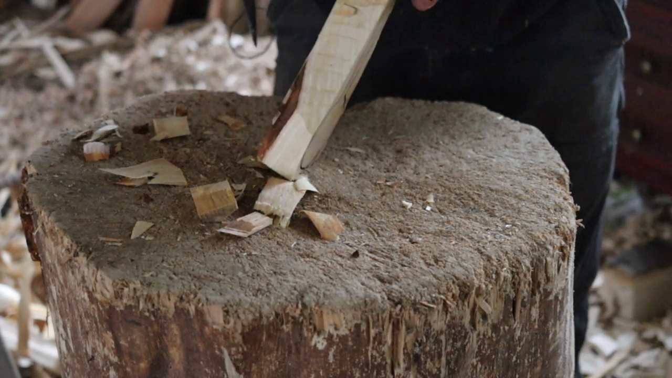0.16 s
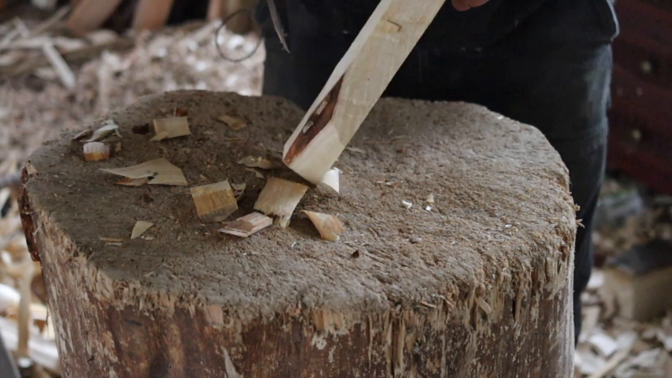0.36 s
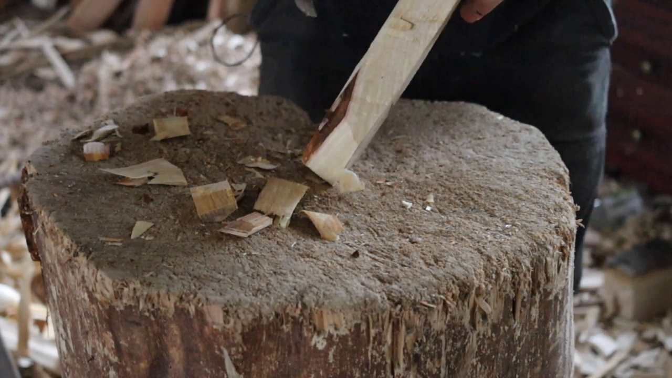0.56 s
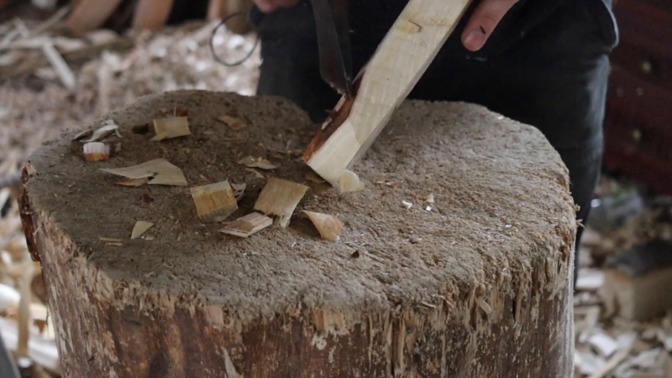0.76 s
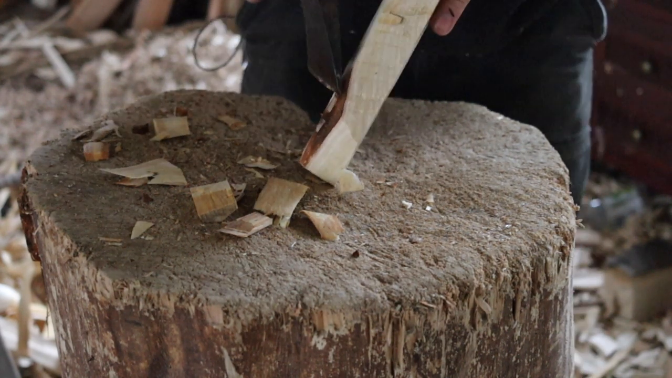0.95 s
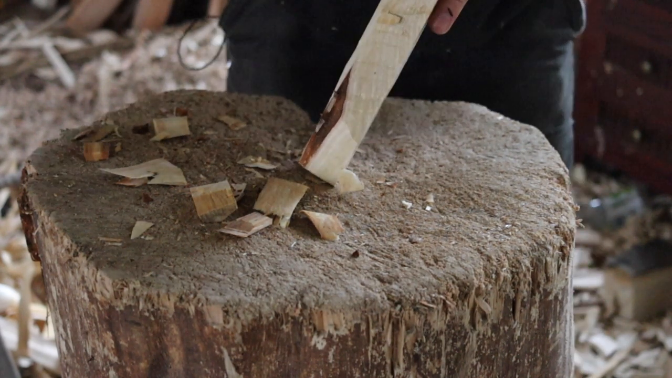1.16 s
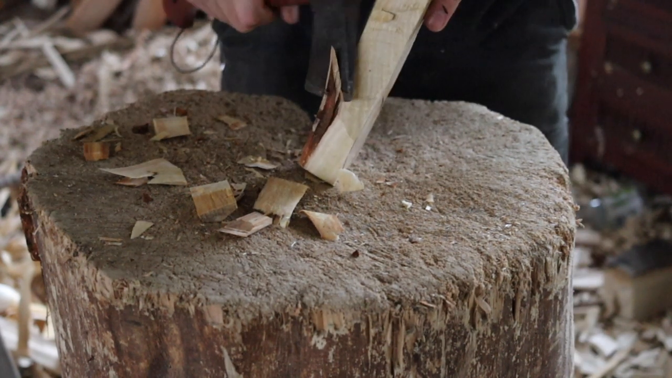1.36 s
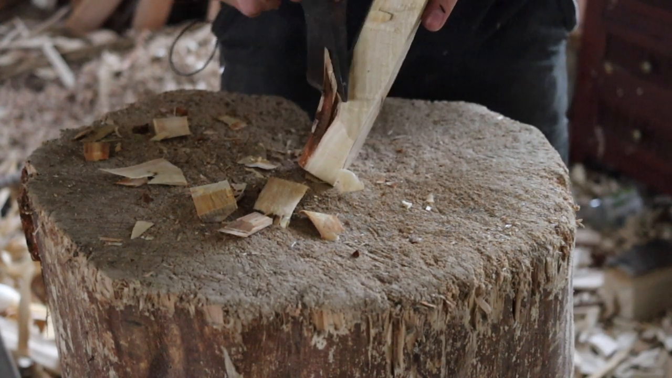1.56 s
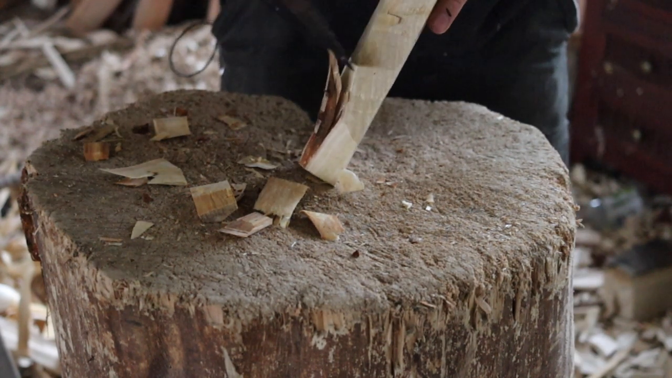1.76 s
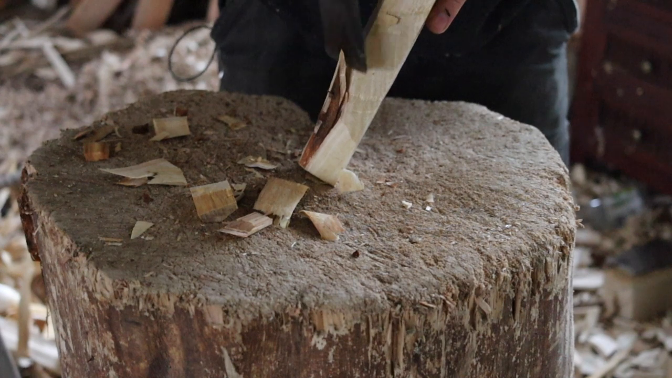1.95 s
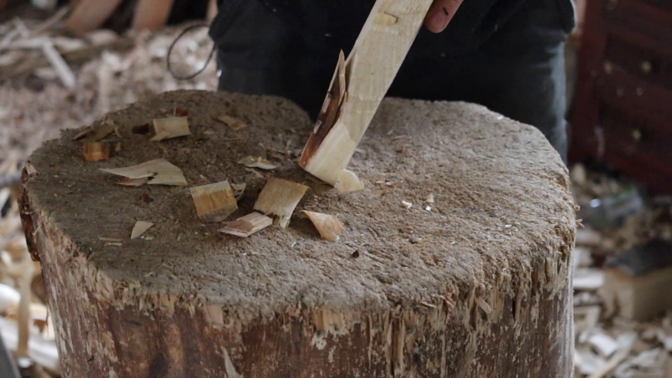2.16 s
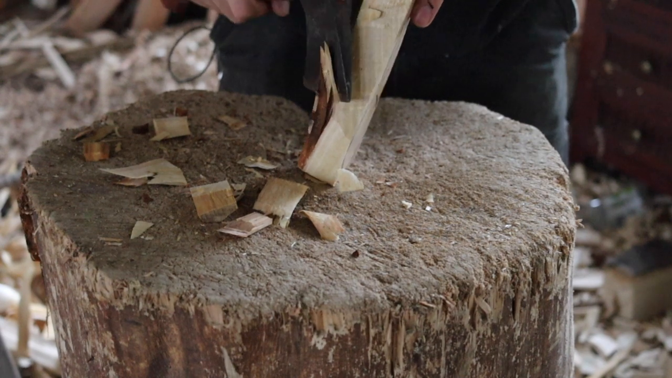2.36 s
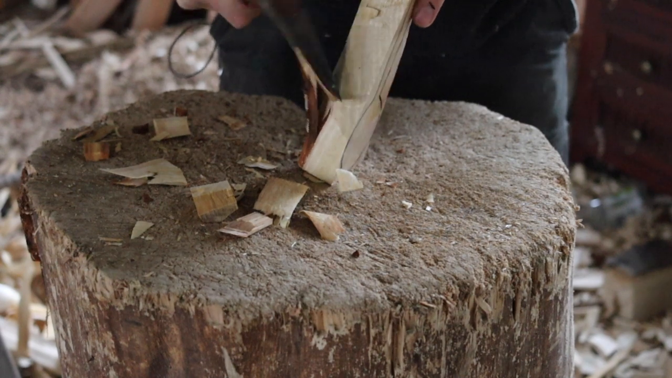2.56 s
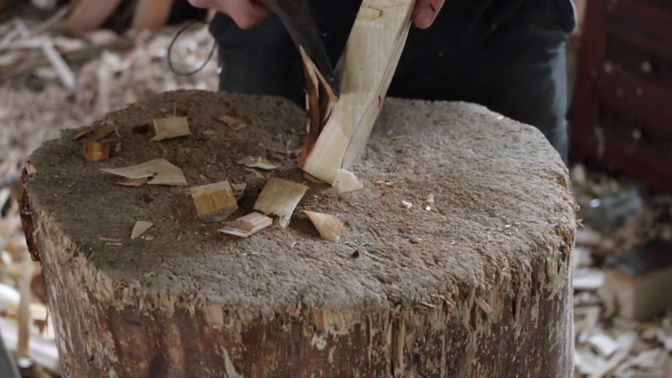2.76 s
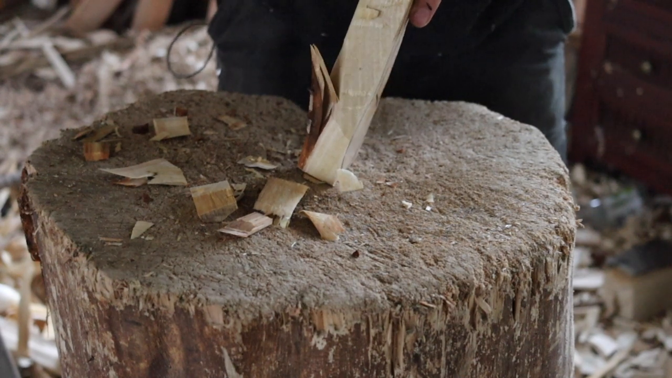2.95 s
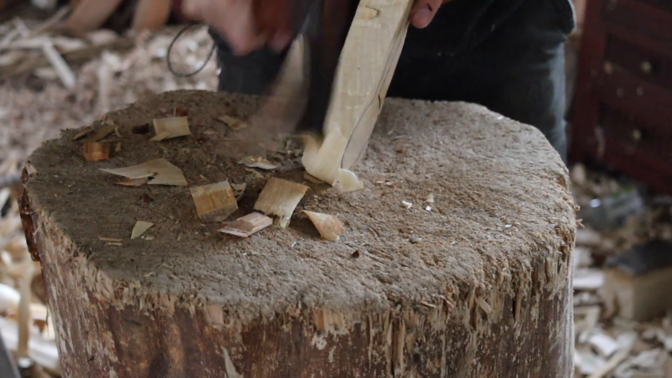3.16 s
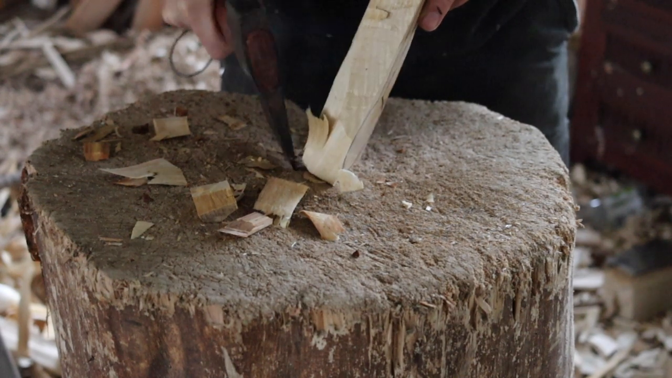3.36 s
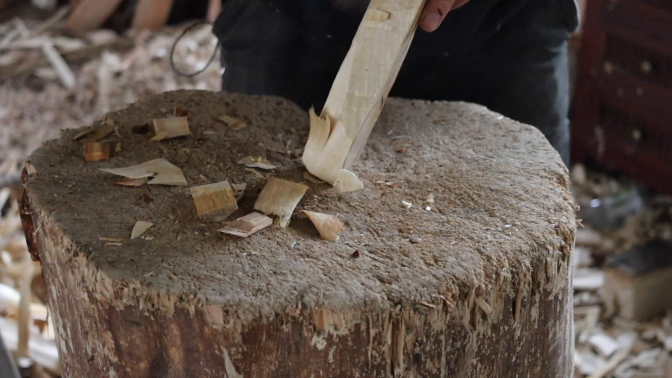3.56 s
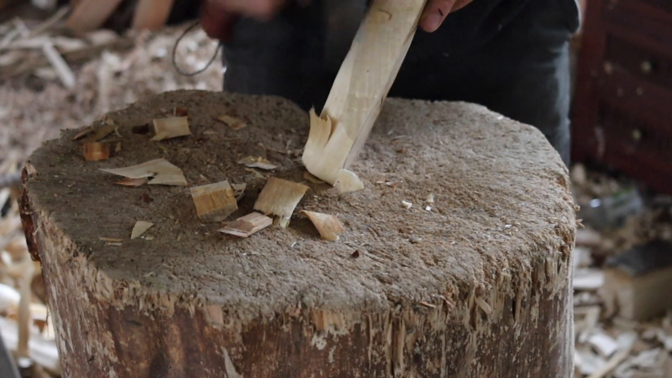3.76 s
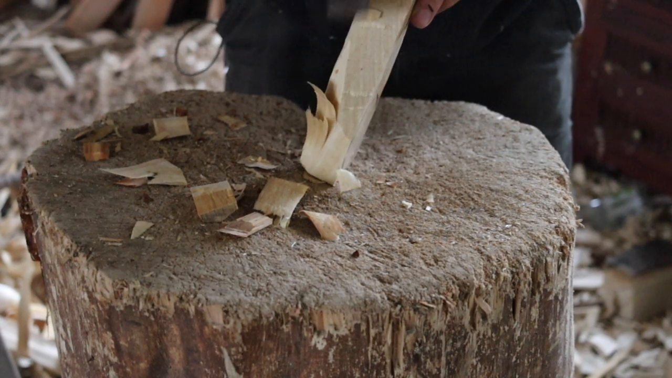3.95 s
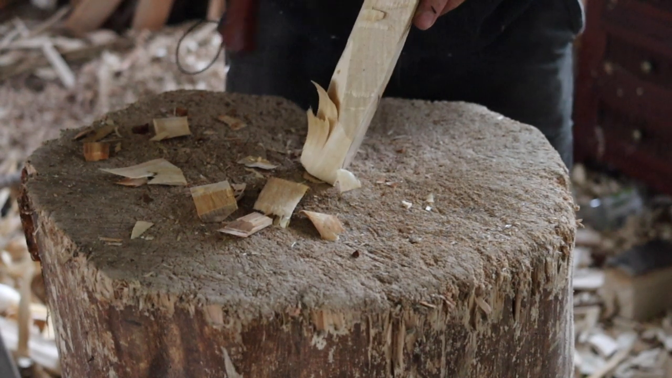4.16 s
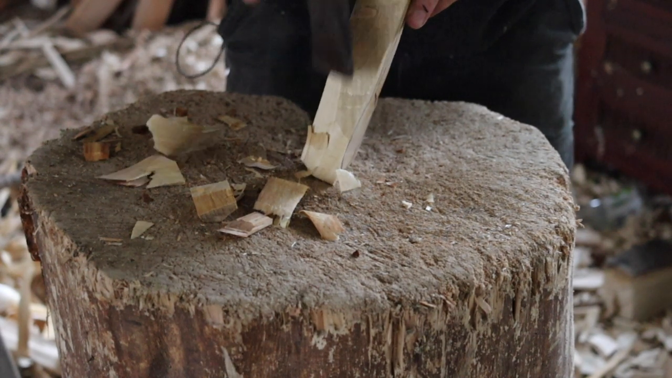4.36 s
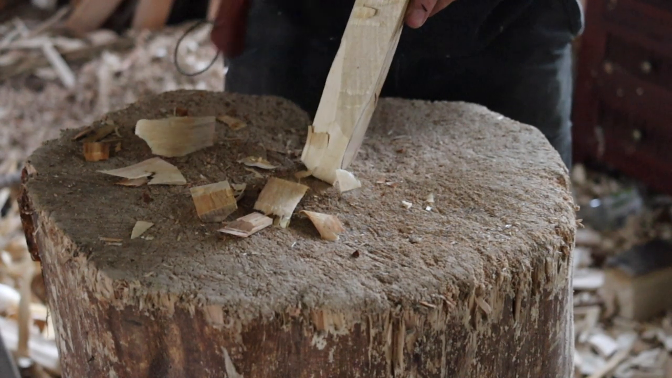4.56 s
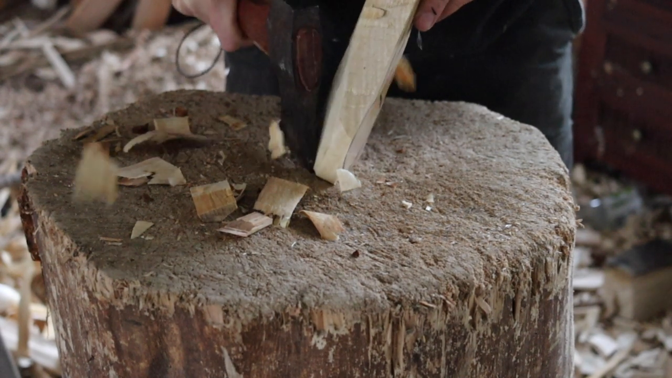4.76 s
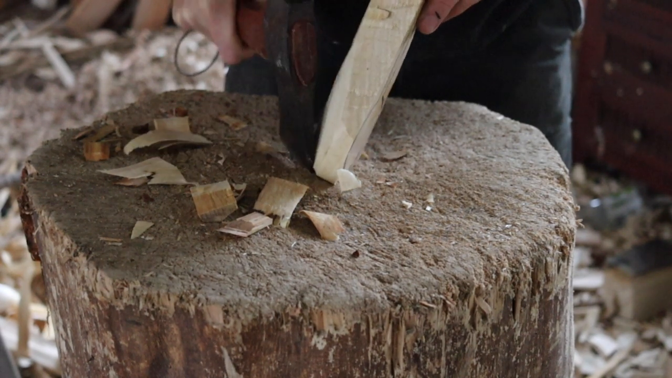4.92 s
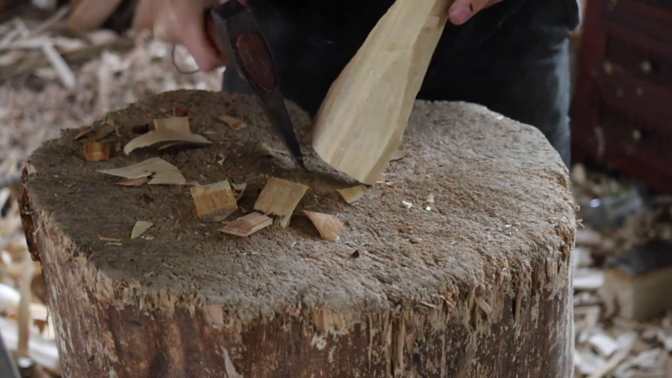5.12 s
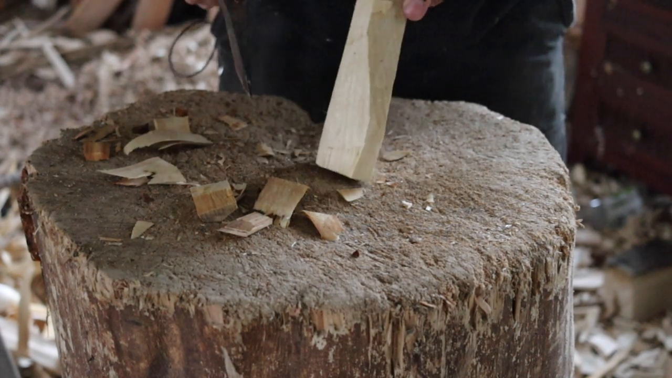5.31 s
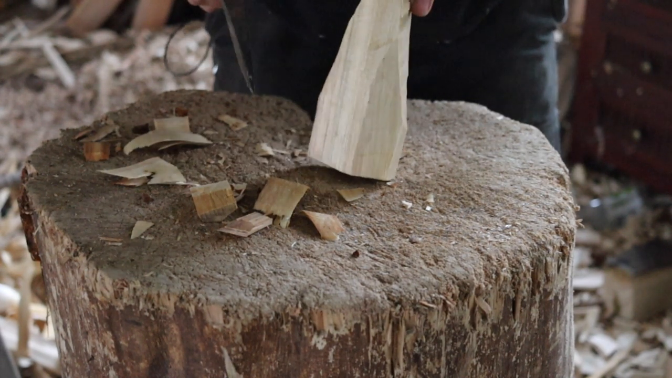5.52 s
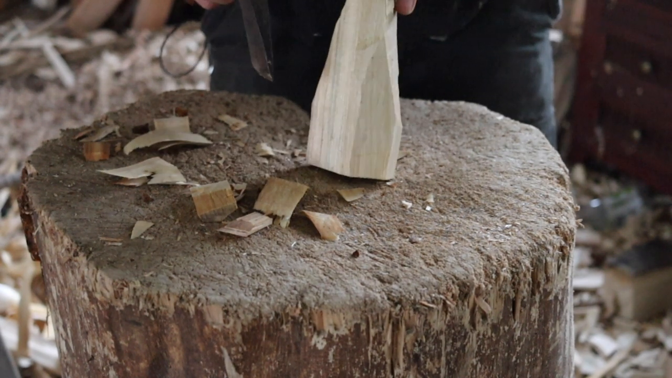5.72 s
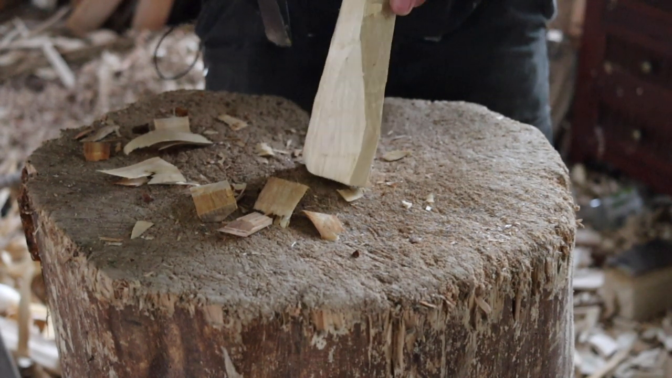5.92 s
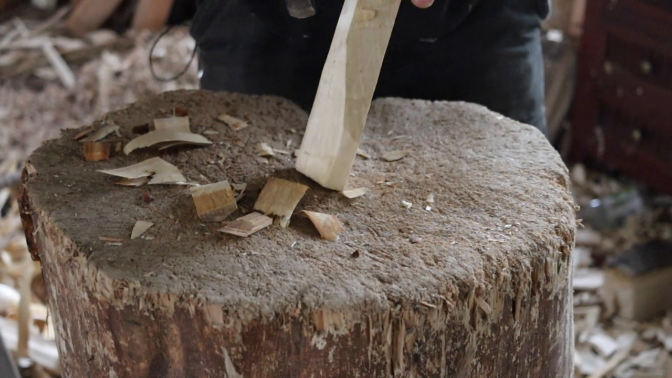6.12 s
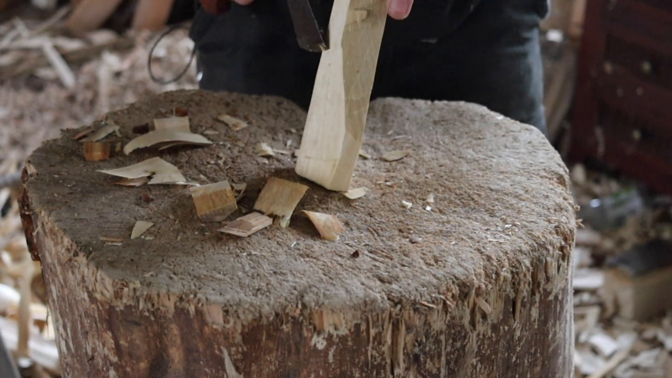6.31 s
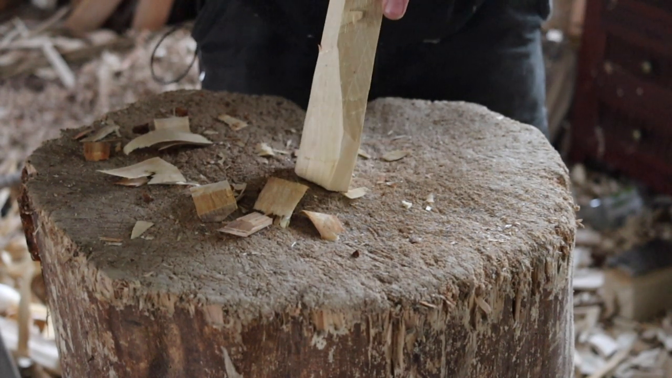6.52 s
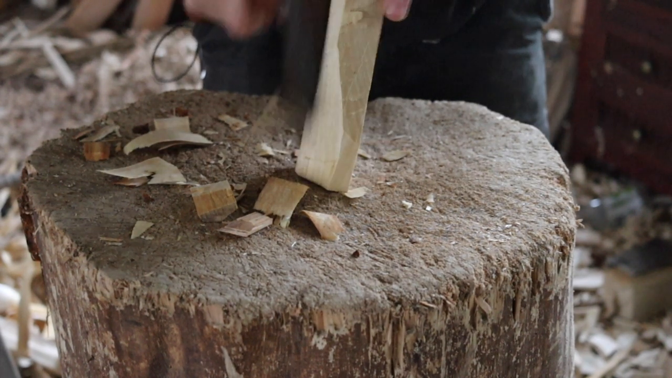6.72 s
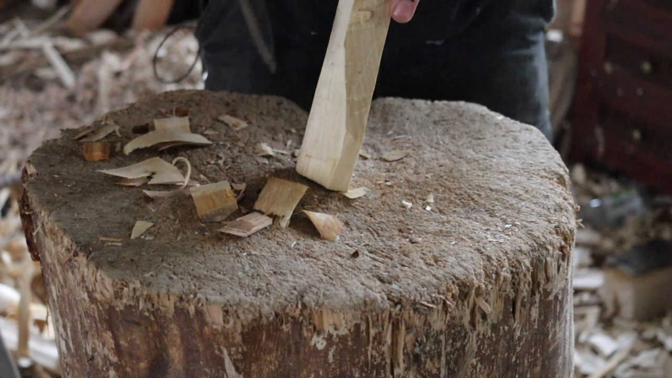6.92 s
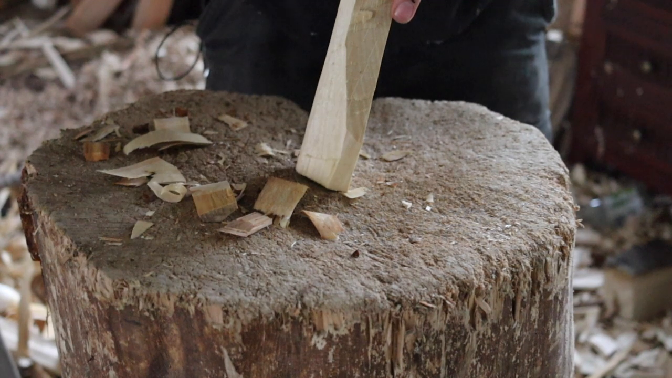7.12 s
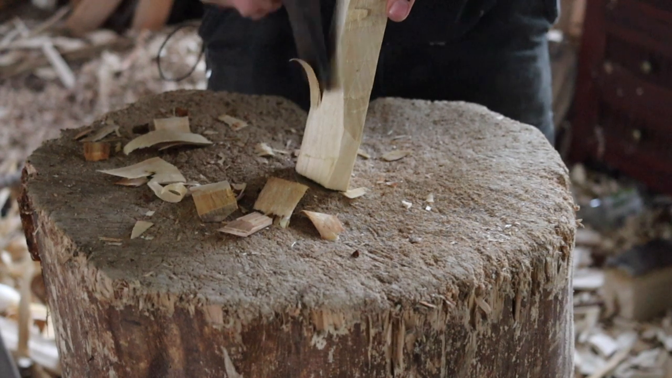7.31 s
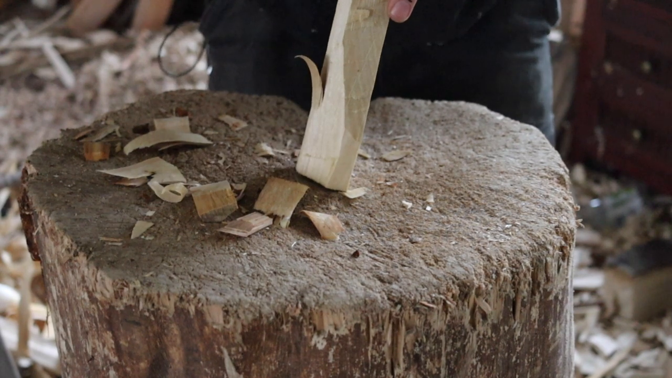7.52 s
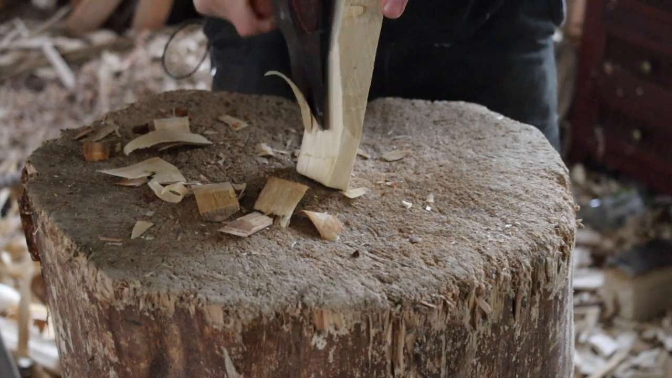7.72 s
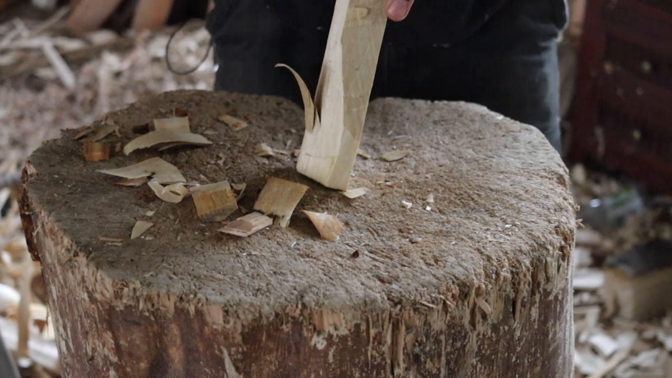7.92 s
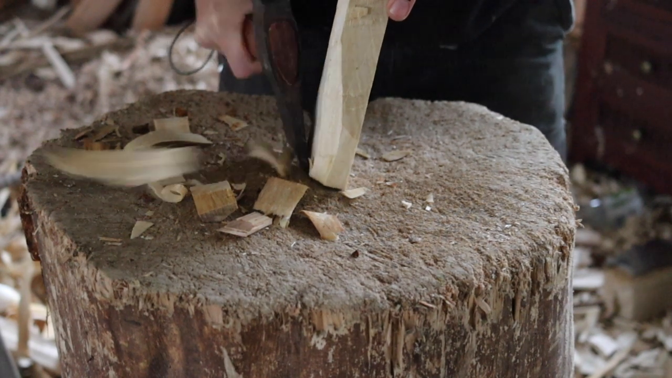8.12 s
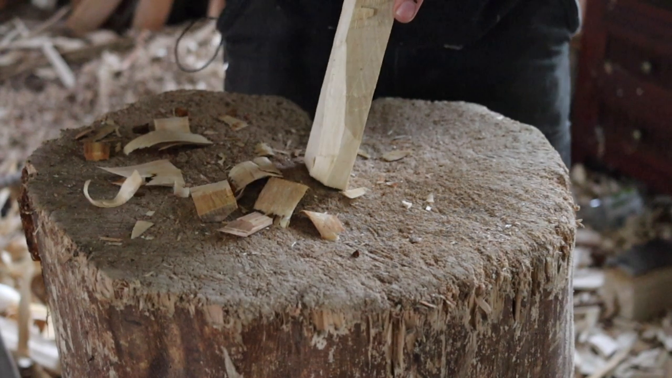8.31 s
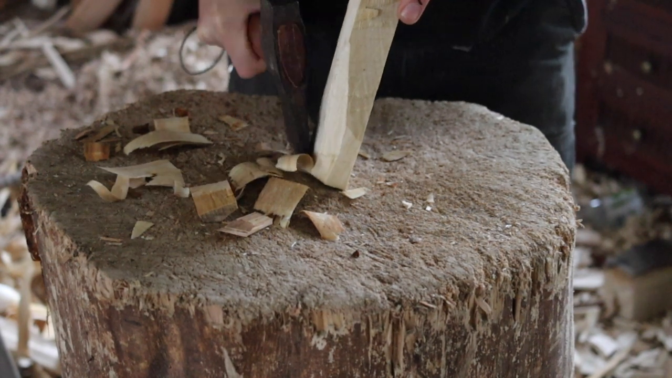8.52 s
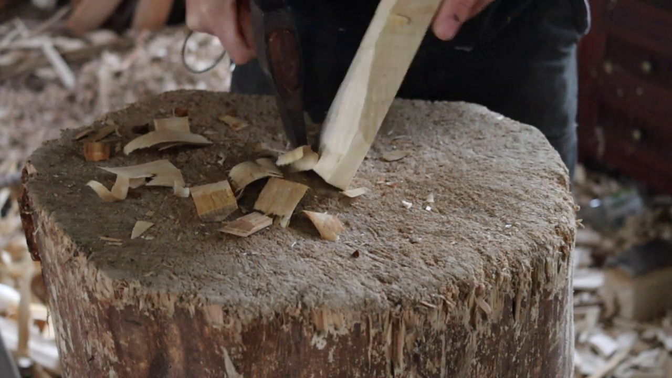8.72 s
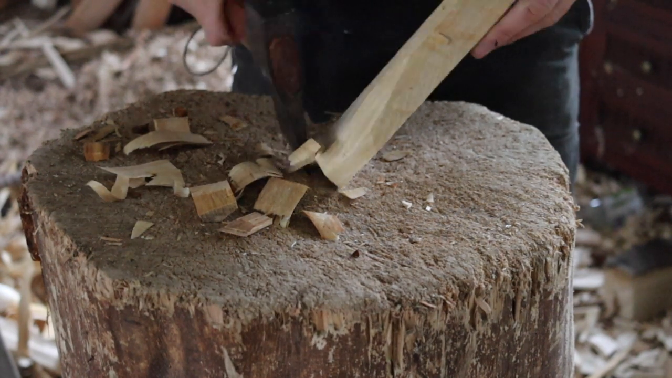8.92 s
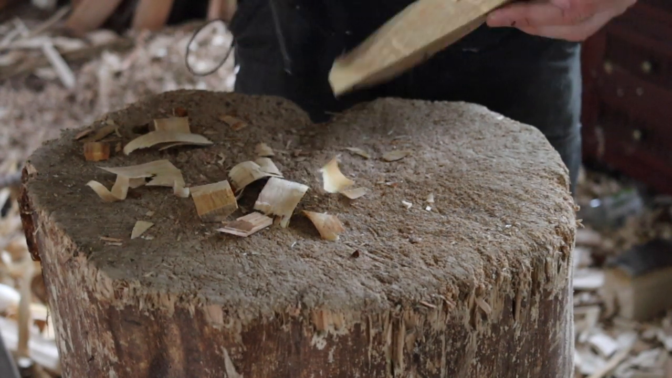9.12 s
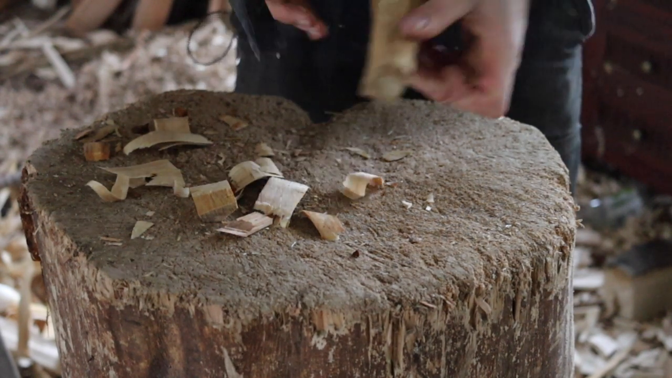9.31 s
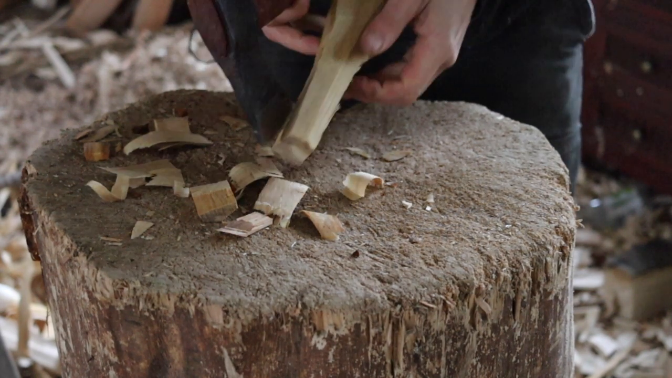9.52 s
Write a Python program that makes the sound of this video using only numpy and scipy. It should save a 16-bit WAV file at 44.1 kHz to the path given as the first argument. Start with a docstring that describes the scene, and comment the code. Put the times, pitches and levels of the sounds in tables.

```python
"""Over faint still air, wood scrapes and taps on a chopping stump; then a small axe hews a wooden spoon blank.
Each chop is an impact and a run of fibre fractures, both exciting damped modes of the wood; what is left
of the swing sounds the stump and shakes the microphone's support. Rubbing, bouncing taps, a glancing blow,
crumbs and snapping splinters are noise and pulses through resonances. Decaying noise forms the workshop's
echo; the close microphone overloads on the blows."""
import sys
import numpy as np
from scipy import signal
from scipy.fft import rfft, irfft
from scipy.io import wavfile
from scipy.ndimage import map_coordinates

SR = 44100
rng = np.random.default_rng(int(sys.argv[2]) if len(sys.argv) > 2 else 0)


def dump(signal):
    """Clip the signal to [-1, 1] and save it as 16-bit WAV at the path in sys.argv[1]."""
    limited = np.clip(np.atleast_2d(signal).T, -1, 1)
    pcm = np.round(limited * 32767).astype(np.int16)
    wavfile.write(sys.argv[1], SR, pcm)


N = 426447

# axe blows: (time [s], knock level [dB], length of the cut [s], share of the cut at which the chip gives way [1],
# tearing level [dB], tearing tilt [dB/octave], blank's ring [Hz], ring level [dB],
# stump's deep thud level [dB], stump's hollow knock level [dB])
CHOPS = [(1.4461, -20, 0.011, 0.79, -18, 9, 2340, -25, -26, -32.5),
         (2.383, -25, .017, 0.41, -28, 0, 2290, -27.5, -29.5, -42),
         (3.2538, -16.5, .013, 1, -9, 2, 2340, -14, -19, -17),
         (3.879, -15.5, .013, .35, -25.5, 3, 2280, -29.5, -26, -21.5),
         (4.3104, -17, 0.008, 0.87, -11.5, .5, 2360, -23.5, -25, -23),
         (4.7016, -19, .015, 0.9, -7.5, -2.5, 2556, -21, -8.5, -12),
         (6.8106, -24.5, 0.019, 0.41, -26, -1.5, 2385, -21.5, -40, -27),
         (6.848, -19.5, 0.0027, 0.59, -35.5, -1, 2390, -41, -13, -21),
         (7.3202, -15.5, .009, 0.58, -21, 4, 2470, -18, -28, -23),
         (7.7525, -13, 0.0097, 0.46, -11, -2, 2130, -28, -20, -20),
         (8.189, -16, 0.0077, 0.2, -3, 0.5, 2345, -18.5, -17, -16),
         (8.586, -8.5, 0.012, 0.29, -6, -4.5, 2290, -12, -7.5, -8)]
# modes of the blank knocked on the stump: (frequency [Hz], width [Hz], level [dB])
KNOCK_MODES = [(179, 430, -13.5), (544, 180, -5.5), (706, 160, 0), (927, 150, 1), (1090, 180, -2.5),
               (1300, 380, -8.5), (1700, 450, -14.5)]
# spectrum of tearing fibres: (frequency [Hz], level [dB])
FIBRE_SPECTRUM = [(100, -13), (500, -1.5), (1200, 5), (3000, 0), (5000, -0.5), (7000, -14.5),
                  (11000, -15.5), (16000, -15.5)]
# overtones of the blank's bending: (frequency [Hz], width [Hz], level before OVERTONE_DB and tilt [dB])
BENDING_OVERTONES = [(4220, 200, -1), (4400, 190, -2), (4980, 200, -9)]
OVERTONE_DB = -8  # shift of all overtones against the main ring
OVERTONE_DB_PER_TILT = 1.1  # a brighter tear lifts them: dB per dB/octave

# the blank is stood on the stump: (time [s], deep thud level [dB])
SET_DOWNS = [(0.873, -35.5), (6.313, -43.5)]
SET_HOLLOW_DB = -6.5  # hollow knock of a set-down, relative to its thud
# deep modes of the stump: (frequency [Hz], width [Hz], level [dB])
THUD_MODES = [(126.5, 31, 2.5), (189.3, 22, 4), (208.3, 18, -1.5), (266, 26, -2.5), (313.6, 18, -2),
              (341, 4.2, -3), (380.6, 14, -2.5)]
# hollow modes of the stump's top: (frequency [Hz], width [Hz], level [dB])
HOLLOW_MODES = [(656, 110, 0), (679.6, 83, -1), (787, 52, 0), (888, 120, -0.5), (1010, 50, 5.5),
                (1140, 280, 1.5), (1291, 250, 0.5), (1385, 180, -2)]
# slow, deep modes of the microphone's support: (frequency [Hz], level [dB], 60 dB decay time [s], delay [s])
SUPPORT_MODES = [(25.05, 3, 1.4, 0.0099), (31, -3, .45, .004), (47.3, 8, 0.45, 0.042), (62, 0.5, .3, 0.011)]
SHAKE_MAX_DB, SHAKE_UNDER_THUD_DB = -33, -6  # limit of the shudder; its level under a gentle thud

# taps of blank, chips and stump, and a glancing blow of the axe:
# (time [s], peak level [dB], tilt [dB/octave])
TAPS = [(.494, -24.5, -7), (.549, -20.5, 20), (.585, -20, 8), (0.5943, -11.5, -0.5), (0.698, -27.5, 10),
        (.72, -21.5, -8.5), (.859, -21, -2), (.95, -25, -1.5), (1.161, -35.5, 4), (1.821, -35, 10.5),
        (1.931, -45, -9.5), (3.7744, -8.5, 0.5), (3.791, -14, 0.5), (3.807, -29, 1), (5.055, -32.5, -7.5),
        (5.2977, -16.5, 2), (5.304, -19.5, 2), (5.4615, -33, -4), (5.57, -26, -0.5), (6.1329, -36.5, -0.5),
        (6.244, -36.5, -8.5), (6.344, -31, 8), (6.446, -40.5, 6), (8.7085, -17, 0), (8.9068, -25.5, -1.5),
        (9.5126, -23, -3.5)]
# spectrum of a tap: (frequency [Hz], level [dB])
TAP_SPECTRUM = [(60, -30), (300, 1.5), (900, 5), (2000, 6.5), (3800, 1.5), (6000, -12.5), (10000, -29.5),
                (16000, -20)]
REBOUND_S, REBOUND_DB = .0095, -10.5  # every tap bounces once
# splinters snap as a chip is levered away: (time [s], peak level of the first snap [dB])
SPLINTERS = [(0.87, -16.5), (1.686, -12), (1.712, -19.5), (1.733, -22.5), (2.684, -18.5), (3.61, -31.5),
             (5.093, -40.5), (5.15, -37), (9.0735, -41)]
# spectrum of a snap: (frequency [Hz], level [dB])
SNAP_SPECTRUM = [(100, -19.5), (600, 2), (1500, -11.5), (2400, -4), (5000, 1.5), (8000, -7), (12000, -2.5),
                 (16000, -13.5)]
RUN_ON_S, RUN_ON_DB = 0.0055, -10.5  # the split runs on: mean gap between snaps, step in level
# modes ringing when the blank meets the axe head: (frequency [Hz], level [dB], 60 dB decay time [s])
CLINK_MODES = [(950, -19, .02), (2140, -16, .08), (2345, -21, .06), (3030, -32, .025), (4280, -38, .04),
               (4500, -39, .04)]
CLINK_S = 9.5135

# the blank is dragged or turned on the stump, or the blade skids off it:
# (start [s], length [s], pressure level [dB], grit level relative to the pressure [dB])
STROKES = [(0.407, 0.11, -46.5, -8), (0.519, 0.1, -42.5, 1), (0.689, 0.081, -47, -7),
           (0.897, 0.062, -40, -3.5), (3.769, 0.024, -40.5, -1.5), (5.291, 0.021, -51.5, -4),
           (5.546, 0.043, -53.5, 2), (6.215, 0.031, -56.5, -17), (6.284, 0.058, -56.5, -2.5),
           (8.872, .04, -61.5, 7.5)]
GRIP_S, SLIDE_DB_PER_S = 0.032, 91  # a stroke takes hold, then slides to rest
# spectrum of rubbing end grain: (frequency [Hz], level [dB])
RUB_SPECTRUM = [(40, -7), (150, 1.5), (400, 3), (900, 4), (1600, -7.5), (3000, -17), (7000, -31),
                (16000, -42)]
# spectrum of grinding over grit: (frequency [Hz], level [dB])
GRIT_SPECTRUM = [(300, -11), (1200, -7.5), (2200, 3), (4000, 2.5), (5500, -2.5), (7500, -13.5),
                 (16000, -17.5)]
CRUMB_DB, CRUMB_SPREAD_DB = 11, 2.5  # peak of a crumb's tick over its stroke's pressure; scatter
CRUMB_LAG_S = 0.053  # crumbs go on ticking this long after a stroke

# decay of the workshop's echo: (frequency [Hz], 60 dB decay time [s])
ROOM_T60 = [(60, 0.29), (160, .42), (400, 0.49), (1100, 0.51), (2900, 0.47), (5000, 0.47), (8000, 0.35),
            (15000, 0.13)]
# strength of the workshop's echo: (frequency [Hz], level [dB])
ROOM_DB = [(40, -18), (150, -6), (400, -7), (1000, -6.5), (2500, -11), (5000, -15.5), (8000, -12.5),
           (15000, -18)]
# spectrum of the still air: (frequency [Hz], level [dB])
AIR_SPECTRUM = [(20, 2.5), (50, -2), (100, -12.5), (200, -13), (400, -15.5), (850, -13.5), (1600, -18.5),
                (2600, -18.5), (4000, -21.5), (6300, -28.5), (16000, -29.5)]

CEILING = .35  # amplitude at which the input flattens the peaks
TOP_HZ = 15900  # band limit
LENGTH = 16384  # samples in a short sound
T = np.arange(LENGTH) / SR
HZ = np.fft.rfftfreq(LENGTH, 1 / SR)


def chops():
    """Impact and fracture excitation of modes: the edge knocks the blank, then its tearing keeps it ringing."""
    out = np.zeros(N)
    for s, knock_db, length, split, tear_db, tilt, ring_hz, ring_db, *_ in CHOPS:
        blow = contact(crush=1.0, t60=0.045)
        cut = cutting(length, split, steady=0.42, release=0.0019, spread_db=6.0)
        lift_db = OVERTONE_DB + OVERTONE_DB_PER_TILT * tilt
        overtones = [(hz, width, db + lift_db) for hz, width, db in BENDING_OVERTONES]
        bending = body([(ring_hz, 140, 0)] + overtones)  # the main mode shifts with grip and cut
        add(out, s, amp(knock_db) * sounded(blow, body(KNOCK_MODES)))
        add(out, s, amp(tear_db) * sounded(cut, colour(FIBRE_SPECTRUM, tilt)))
        add(out, s, amp(ring_db) * sounded(cut, bending))
    return out


def cutting(length, split, steady, release, spread_db):
    """Progressive fracture: fibres part while the edge moves, most of all when the chip gives way."""
    effort = steady + np.exp(-((T / length - split) / .16) ** 2)
    dying = np.exp(-np.maximum(T - length, 0) / release)
    return effort * dying * crackle(spread_db)


def stump():
    """Modal response of a heavy block: what is left of the swing drives blank or blade into the stump."""
    out = np.zeros(N)
    for s, thud_db, hollow_db, _ in landings():
        add(out, s, amp(thud_db) * sounded(contact(crush=0.66, t60=0.049), body(THUD_MODES)))
        add(out, s, amp(hollow_db) * sounded(contact(crush=.8, t60=0.045), body(HOLLOW_MODES)))
    return out


def landings():
    """Momentum transfer as each cut ends or the blank is set down: (time [s], thud, hollow, shake level [dB])."""
    blows = [(s + length, thud_db, hollow_db) for s, _, length, *_, thud_db, hollow_db in CHOPS]
    blows += [(s, db, db + SET_HOLLOW_DB) for s, db in SET_DOWNS]
    return [(s, thud_db, hollow_db, min(SHAKE_MAX_DB, thud_db + SHAKE_UNDER_THUD_DB))
            for s, thud_db, hollow_db in blows]


def shudder():
    """Damped free vibration: a landing shakes the microphone's support, always with the same slow waveform."""
    out, t = np.zeros(N), np.arange(2 * SR) / SR
    shake = np.zeros(len(t))
    for hz, db, t60, delay in SUPPORT_MODES:
        shake += amp(db - 60 * t / t60) * np.sin(2 * np.pi * hz * np.maximum(t - delay, 0))
    for s, *_, shake_db in landings():
        add(out, s, amp(shake_db) * shake)
    return out


def taps():
    """Impact and rebound: blank, chips and stump tap, or the axe glances, and each contact bounces once."""
    out = np.zeros(N)
    for s, db, tilt in TAPS:
        piece = colour(TAP_SPECTRUM, tilt) * chip(400, 4000)
        for delay, loss_db in (0, 0), (REBOUND_S, REBOUND_DB):
            tap = sounded(contact(crush=1.6, t60=.02), piece)
            add(out, s + delay, amp(db + loss_db) * at_peak(tap))
    return out


def splinters(count=3):
    """Brittle fracture: a splinter snaps and the split runs on in weaker snaps."""
    out = np.zeros(N)
    for s, db in SPLINTERS:
        for k in range(count):
            snap = sounded(contact(crush=1.12, t60=0.015), colour(SNAP_SPECTRUM) * chip(2000, 7000))
            add(out, s, amp(db + k * RUN_ON_DB) * at_peak(snap))
            s += RUN_ON_S * (.5 + rng.random())
    return out


def clink():
    """Free decay of modes: the blank touches the axe head and sets off damped sines."""
    out = np.zeros(N)
    ring = sum(amp(db - 60 * T / t60) * np.sin(2 * np.pi * hz * T) for hz, db, t60 in CLINK_MODES)
    add(out, CLINK_S, ring)
    return out


def drag(catch_rate=90):
    """Stick-slip friction: end grain rubs on the stump and grinds over grit, catching unevenly."""
    pressure, grinding = np.zeros(N), np.zeros(N)
    for s, length, db, grit_db in STROKES:
        push = stroke(s, length)
        pressure = np.maximum(pressure, amp(db) * push)
        grinding = np.maximum(grinding, amp(db + grit_db) * push)
    knots = np.arange(N) * catch_rate / SR  # catch_rate in random values per second

    def catching():
        """Random friction: a gain that wanders between random levels in dB."""
        levels = rng.standard_normal(int(knots[-1]) + 4)
        return amp(3 * map_coordinates(levels, [knots], order=1))

    rub = shaped(crackle(spread_db=4.5, size=N) * catching(), RUB_SPECTRUM)
    grit = shaped(crackle(spread_db=4, size=N) * catching(), GRIT_SPECTRUM)
    return pressure * rub + grinding * grit


def stroke(start, length):
    """Contact pressure envelope: a stroke takes hold, stays and dies away."""
    t = np.arange(N) / SR - start
    return np.clip(t / GRIP_S, 0, 1) * amp(-SLIDE_DB_PER_S * np.maximum(t - length, 0))


def crumbs(count=3):
    """Random small impacts: each stroke nudges a few loose crumbs of wood, which tick."""
    out = np.zeros(N)
    for s, length, db, _ in STROKES:
        for when in rng.random(count):
            piece = colour(TAP_SPECTRUM, tilt=2.0) * chip(400, 4000)
            tick = sounded(contact(crush=0.98, t60=0.019), piece)
            tick_db = db + CRUMB_DB + CRUMB_SPREAD_DB * rng.standard_normal()
            add(out, s + when * (length + CRUMB_LAG_S), amp(tick_db) * at_peak(tick))
    return out


def room(x, build=0.0062):
    """Diffuse reverberation: the echo builds up quickly, dies at a rate set by pitch, differs from chop to chop."""
    out = np.zeros(N)
    edges = [0] + [round((row[0] - .01) * SR) for row in CHOPS] + [N]
    for a, b in zip(edges, edges[1:]):
        hz, t, z = signal.stft(rng.standard_normal(SR * 3 // 4), SR, nperseg=256)
        t60 = along(ROOM_T60, hz)[:, None]
        energy = SR * t60 / np.log(1e6)  # of an exponential decay from 1
        gain = amp(along(ROOM_DB, hz)[:, None] - 60 * t / t60) / np.sqrt(energy)
        tail = signal.istft(z * gain * (1 - np.exp(-t / build)), SR, nperseg=256)[1]
        add(out, a / SR, signal.fftconvolve(x[a:b], tail))
    return out


def still_air():
    """Stationary random noise: a faint steady hiss and rumble."""
    return amp(-60) * shaped(rng.standard_normal(N), AIR_SPECTRUM)


def amp(db):
    """Logarithmic level: decibels to amplitude gain."""
    return 10 ** (np.asarray(db) / 20)


def along(points, hz):
    """Logarithmic pitch scale: (frequency [Hz], value) points interpolated on it."""
    f, v = np.transpose(points)
    return np.interp(np.log(hz + 1), np.log(f), v)


def add(track, s, sound):
    """Superposition: mix a sound in at a time in seconds."""
    part = track[round(s * SR):][:len(sound)]
    part += sound[:len(part)]


def at_peak(x):
    """Linear scaling to a peak of 1."""
    return x / np.abs(x).max()


def colour(points, tilt=0):
    """Minimum phase: a causal response of given spectrum, up to a constant gain, tilted in dB per octave."""
    octaves = np.log2(np.clip(HZ, 250, 6000) / 1000)  # the tilt acts through the middle range
    gain = amp(along(points, HZ) + tilt * octaves)
    cepstrum = irfft(np.log(gain))
    return np.exp(rfft(2 * cepstrum[:LENGTH // 2], LENGTH))


def body(modes):
    """Modal superposition: damped resonators (frequency [Hz], width [Hz], level [dB]) of alternating sign."""
    response = 0
    for k, (f, w, db) in enumerate(modes):
        damping = 1j * HZ * w
        response = response + (-1) ** k * amp(db) * damping / (f * f - HZ ** 2 + damping)
    return response


def chip(low_hz, high_hz, quality=14, ring_db=5, count=5):
    """Individual resonance: every piece adds a few modes of its own to the direct sound."""
    pitches = low_hz * (high_hz / low_hz) ** rng.random(count)
    return 4 + sum(body([(hz, hz / quality, ring_db)]) for hz in pitches)


def contact(crush, t60):
    """Contact force: one sharp push, then a short crushing of the surfaces."""
    grit = crackle(4) * amp(-60 * T / t60)
    return (T == 0) + crush * grit / np.linalg.norm(grit)


def crackle(spread_db, size=LENGTH):
    """Fracture noise: tiny breaks of very unequal strength, scaled to a standard deviation of 1."""
    strength = np.repeat(rng.standard_normal(size // 16 + 1), 16)[:size]  # held for 16 samples
    x = rng.standard_normal(size) * amp(spread_db * strength)
    return x / x.std()


def sounded(force, response):
    """Linear filtering: a force through a response, with the energy of 10 ms at rms 1."""
    x = irfft(rfft(force) * response)[:SR // 4]
    return x / np.sqrt(np.sum(x ** 2) / (SR / 100))


def shaped(x, points):
    """Spectral shaping: a long noise given a spectrum, at rms 1."""
    y = irfft(rfft(x) * amp(along(points, np.fft.rfftfreq(N, 1 / SR))), N)
    return y / y.std()


def scene(count=3):
    """Superposition of the work at the stump, its room and the still air."""
    light = taps() + splinters() + clink() + drag() + crumbs()
    # several random echoes are averaged, so the echo is dense and even
    echo = sum(room(chops() + stump()) for _ in range(count)) / np.sqrt(count)
    direct = chops() + stump() + light
    return (direct + echo + amp(2.0) * room(light) + shudder() + still_air())[None]


def record(dry, hardness=5, droop_db=4):
    """Saturation and band limit: the input stage flattens loud peaks; the top octave droops to the limit."""
    clipped = dry / (1 + np.abs(dry / CEILING) ** hardness) ** (1 / hardness)
    hz = np.fft.rfftfreq(N, 1 / SR)
    passband = np.clip((TOP_HZ - hz) / 500 + .5, 0, 1)
    return irfft(rfft(clipped) * amp(-droop_db * (hz / TOP_HZ) ** 4) * passband, N)


dry = scene()
out = record(dry)
dump(out)
```